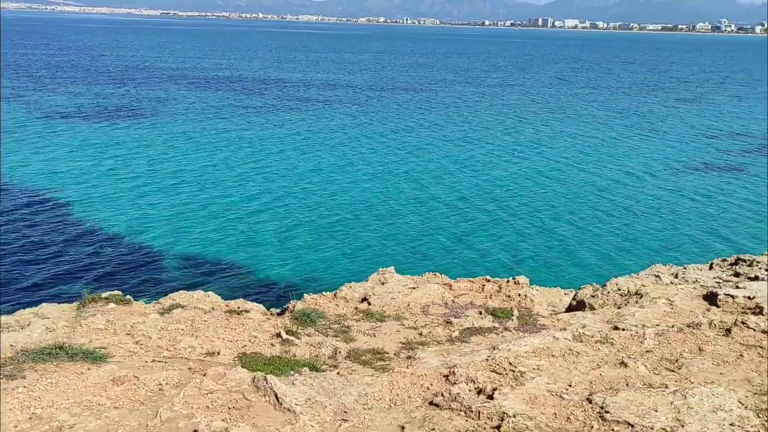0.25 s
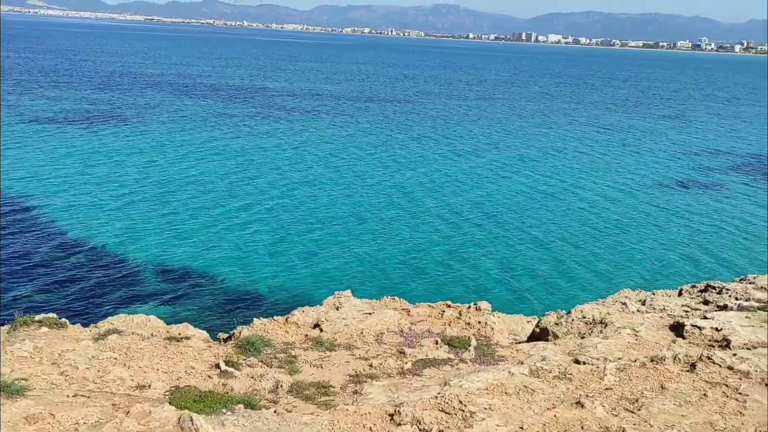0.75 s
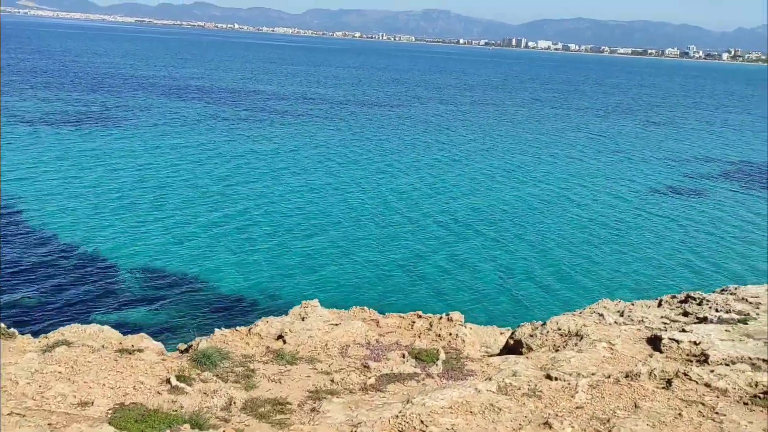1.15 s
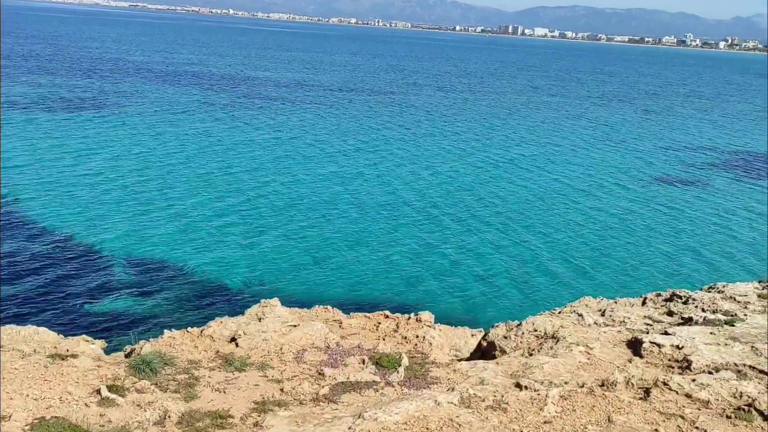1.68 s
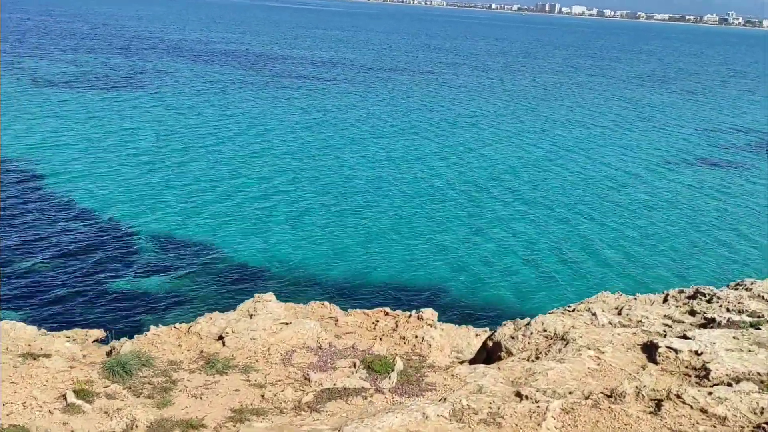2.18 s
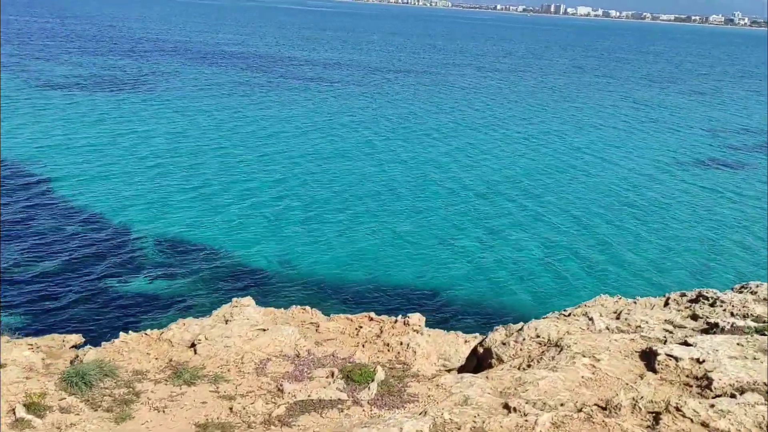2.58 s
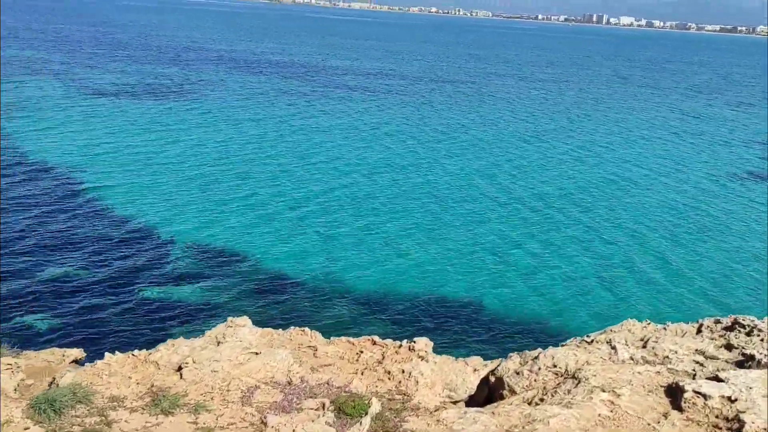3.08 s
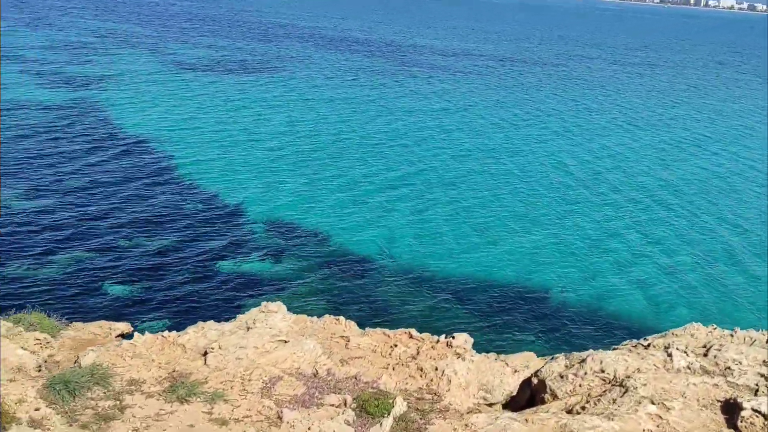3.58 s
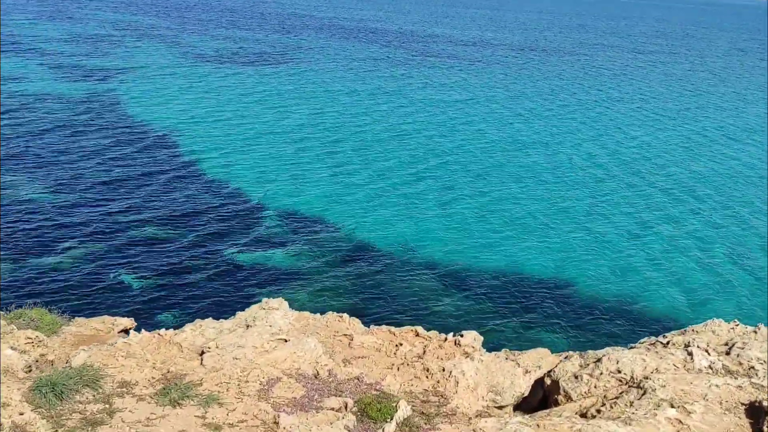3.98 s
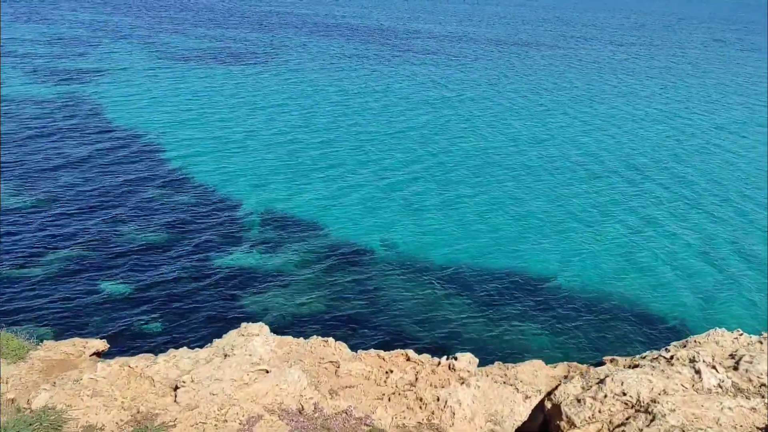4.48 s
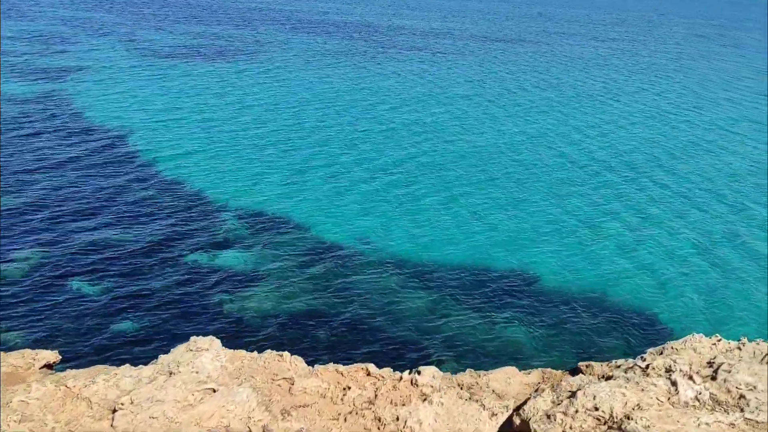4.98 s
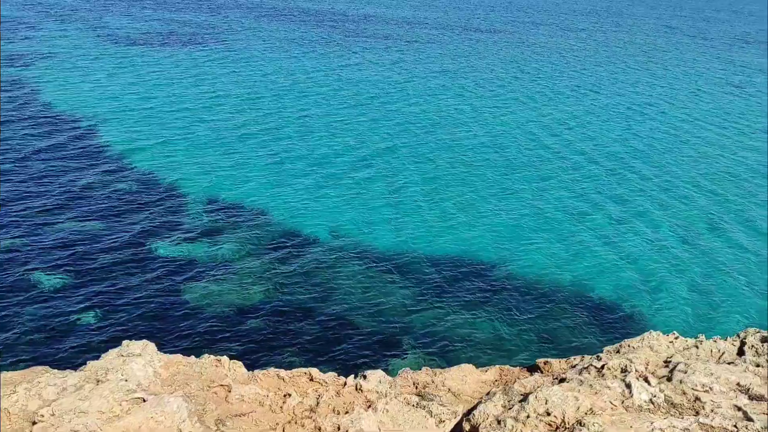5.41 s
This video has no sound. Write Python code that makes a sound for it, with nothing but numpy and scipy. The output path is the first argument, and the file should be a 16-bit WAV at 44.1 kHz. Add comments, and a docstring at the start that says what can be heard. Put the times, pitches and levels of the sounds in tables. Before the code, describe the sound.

Uneven footsteps on a rocky cliff, about two a second at most, each a cluster of sharp cracks and gritty crunching. The strongest come between one and two seconds; later ones are softer scuffs, with two tiny sole squeaks near the middle. Deep wind buffets the bare handheld microphone, shifting between sides, above very quiet distant sea wash and faint birds.

```python
"""Walker on a sea cliff

Dry, broken rock underfoot, taken on a hand-held phone with two microphone ports.
Close below, slips of stone ring and snap, grit grinds in grains and a sole squeaks by sticking and slipping.
Right on the ports, wind is separate shaped noise at each, with eddies as dull resonant thumps.
Far off, the sea is a hiss of shaped noise; a bird hoots three falling notes and a small one chirps, as gliding tones."""
import sys
import numpy as np
from scipy import signal
from scipy.fft import rfft, irfft
from scipy.io import wavfile
from scipy.ndimage import uniform_filter1d

SR = 44100
rng = np.random.default_rng(int(sys.argv[2]) if len(sys.argv) > 2 else 0)


def boost(x):
    """Linear amplitude factor 10**(x/20) for a level x in decibels (scalar or array-like)."""
    u = np.asarray(x, float) / 20
    return 10 ** u


def generate_wav(sig):
    """Save sig (samples, or channels by samples) to the path in sys.argv[1] as 16-bit PCM at SR."""
    pcm = np.round(np.clip(np.atleast_2d(sig).T, -1, 1) * 32767).astype(np.int16)
    wavfile.write(sys.argv[1], SR, pcm)


N = 249165
T = np.arange(N) / SR


def level(x, db):
    """Scale to an rms level."""
    return x * boost(db) / np.sqrt(np.mean(x ** 2))


def colour(x, table):
    """Filter by gains in dB, joined by straight lines over log frequency."""
    hz, db = np.transpose(table)
    f = np.maximum(np.arange(x.shape[-1] // 2 + 1) * SR / x.shape[-1], 1)
    gain = boost(np.interp(np.log(f), np.log(hz), db))
    return irfft(rfft(x) * gain, x.shape[-1])


def butter(x, order, hz, kind="low"):
    """Filter away what lies above (low) or below (high) a corner frequency."""
    return signal.sosfilt(signal.butter(order, hz, kind, fs=SR, output="sos"), x)


def walk(rate):
    """Random values, each held 1 / rate s, then slewed twice."""
    k = int(SR / rate)
    held = np.repeat(rng.standard_normal(N // k + 1), k)
    return 2.96 * uniform_filter1d(uniform_filter1d(held, k), k)[:N]


def add(out, s, x):
    """Mix x into out from time s."""
    i = int(s * SR)
    out[..., i:i + x.shape[-1]] += x[..., :N - i]


def ring(x, hz, width_hz):
    """One damped resonance; the wider it is, the sooner it dies."""
    r = np.exp(-np.pi * width_hz / SR)
    return signal.lfilter([1, 0, -1], [1, -2 * r * np.cos(2 * np.pi * hz / SR), r * r], x) * (1 - r * r) / 2


def sag(x, start, within_s):
    """Let the pitch begin `start` times higher and sink to its rest."""
    t = np.arange(len(x)) / SR
    return np.interp(t + (start - 1) * within_s * (1 - np.exp(-t / within_s)), t, x)


# steady wind on the ports, before flutter: (time [s], left level [dB], right level [dB])
GUSTS = [(0.0, -54.5, -44.5), (0.35, -60, -46.5), (0.713, -66.5, -58.5), (1.09, -57, -47),
         (1.41, -60.5, -52), (1.771, -67.5, -43), (2.12, -44, -63), (2.47, -50.5, -49), (2.829, -51.5, -53),
         (3.178, -47.5, -50), (3.525, -55, -59), (3.883, -57.5, -52), (4.24, -46.5, -43),
         (4.59, -50, -59.5), (4.94, -62.5, -48.5), (5.299, -53, -54.5), (5.65, -64.5, -47.5)]
# turbulence spectrum, falling steeply above the rumble: (frequency [Hz], gain [dB])
TURBULENCE = [(20, 5), (60, 3.5), (110, -3.5), (165, -1), (250, -14), (350, -24.5), (500, -37.5),
              (900, -62)]


def wind():
    """Unrelated turbulence at each port; three bands follow the gusts by their own share and flutter alone."""
    s, *port_db = np.transpose(GUSTS)
    gust = boost(np.array([np.interp(T, s, db) for db in port_db]))
    mean = np.sqrt(np.mean(gust ** 2))
    noise = level(colour(rng.standard_normal((2, N)), TURBULENCE), 3.96) * mean
    deep = butter(noise, 2, 80)
    edge = butter(noise, 2, 230, "high")
    middle = noise - deep - edge
    out = 0
    # the exponent says how closely each band follows a gust
    for band, follow in ((deep, 0.3), (middle, 1), (edge, 0.71)):
        flutter = boost(2.0 * np.array([walk(26), walk(26)]))
        out = out + band * (gust / mean) ** follow * flutter
    return out


# colour of the wash far below: (frequency [Hz], gain [dB])
WASH = [(200, -27.5), (400, -6), (800, -12), (1200, -18), (2600, -15.5), (4400, -12.5), (6300, -18),
        (10000, -17.5)]


def sea():
    """Distant wash, smooth and slowly swelling; the lows are partly shared by both ports."""
    shared = butter(rng.standard_normal(N), 1, 2000)
    swell = boost(0.8 * walk(3))
    wash = colour(0.43 * shared + rng.standard_normal((2, N)), WASH)
    return level(wash, -67.5) * swell


# eddies that thump the left port, then the right: (time of the peak [s], push level [dB], fade [s])
THUMPS = [
    [(0.673, -35.5, 0.004), (2.0, -25, 0.049), (2.225, -39, 0.038), (2.789, -33.5, 0.013),
     (3.122, -28, 0.013), (4.1, -36, 0.025), (4.192, -35.5, 0.0091), (4.375, -35, 0.055),
     (4.44, -27.5, 0.026)],
    [(0.02, -27, 0.0059), (0.16, -31, 0.022), (0.334, -33.5, 0.027), (0.446, -19, 0.01),
     (0.52, -30.5, 0.045), (0.562, -29.5, 0.016), (0.649, -39.5, 0.014), (1.072, -23, 0.02),
     (1.118, -26, 0.013), (2.285, -29, 0.015), (2.569, -34.5, 0.03), (2.619, -30, 0.012),
     (3.009, -28.5, 0.013), (4.001, -35, 0.014), (4.259, -31, 0.012), (4.45, -37.5, 0.079),
     (5.233, -34.5, 0.043), (5.587, -30, 0.02)],
]


def buffets():
    """A shed eddy slaps one port: a dull pressure wobble swells fast, sinks in pitch and fades."""
    out, t, rise_s = np.zeros((2, N)), np.arange(SR // 3) / SR, 0.011
    for port, rows in zip(out, THUMPS):
        for s, db, fade_s in rows:
            # weak pushes wobble near 123 Hz; beyond a soft knee at -25.5 dB the pitch climbs
            octaves = np.logaddexp(0, (db + 25.5) / 1.66) * 2.7 / 14
            hz = 123 * 2 ** octaves
            push = rng.standard_normal(len(t))
            wobble = ring(push, hz, 0.28 * hz) + ring(push, 0.44 * hz, 0.36 * hz)
            # the eddy keeps its strength from cycle to cycle
            wobble /= np.sqrt(uniform_filter1d(wobble ** 2, int(1.5 * SR / hz)))
            wobble = sag(wobble, 2.6, 0.011)
            swell = np.sin(np.pi / 2 * np.minimum(t / rise_s, 1)) ** 2
            swell = swell * np.exp(-np.maximum(t - rise_s, 0) / fade_s)
            dull = butter(swell * wobble, 3, 1.994 * hz)
            # its steep front leaks a brief brighter knock
            front = np.exp(-((t - 0.91 * rise_s) / 0.0027) ** 2)
            knock = 0.22 * (hz / 240) ** 3.1 * ring(push, 4.6 * hz, 4 * hz) * front
            add(port, s - rise_s, boost(db) * (dull + knock))
    return out


def sides(pan_db):
    """Left and right amplitudes whose powers add to one."""
    left = 1 / (1 + boost(-2 * np.asarray(pan_db)))
    return np.sqrt(np.array([left, 1 - left]))


# three hoots, then chirps:
# (start [s], length [s], start pitch [Hz], end pitch [Hz], level [dB], left minus right [dB])
BIRD_NOTES = [(.06, 0.3, 570, 480, -73.5, 15), (.78, 0.16, 561, 490, -75, 16),
              (1.3, 0.17, 530, 440, -68, 8), (0.317, 0.051, 3950, 3860, -58.5, 0),
              (3.278, 0.04, 4570, 4500, -63, 2), (4.502, 0.032, 4090, 3500, -71, -4),
              (4.558, 0.045, 3200, 2880, -73, -2), (5.362, 0.059, 3600, 3780, -69, -4),
              (5.388, 0.036, 5700, 5900, -71, -5), (5.407, 0.045, 4700, 5050, -66, -5)]


def birds():
    """Gliding, slightly wavering sine notes with soft ends."""
    out = np.zeros((2, N))
    for s, length_s, start_hz, end_hz, db, pan_db in BIRD_NOTES:
        glide = np.linspace(start_hz, end_hz, int(length_s * SR))
        hz = glide * (1 + 0.025 * walk(200)[:len(glide)])
        note = np.hanning(len(hz)) * np.sin(2 * np.pi * np.cumsum(hz) / SR)
        add(out, s, 2 * boost(db) * sides(pan_db)[:, None] * note)
    return out


def grains(per_s, spread_db, lag_s):
    """One-sample slips, long-tailed in size; each lies elsewhere, so has its own lag at the right port."""
    count = int(per_s * N / SR)
    at = rng.integers(0, N, count)
    size_db = spread_db * np.minimum(rng.exponential(size=count), 4.0)
    size = boost(size_db) * rng.standard_normal(count)
    lag = np.round(lag_s * SR * rng.standard_normal(count)).astype(int)
    late = np.clip(at + lag, 0, N - 1)
    return np.array([np.bincount(at, size, N), np.bincount(late, size, N)])


def pebbles():
    """Stones of every size knock apart from each other, each ringing a few cycles at its own pitch."""
    out = 0
    for hz in np.geomspace(400, 6000, num=9):
        knocks = grains(450, 3.6, 0.0002)
        stones = ring(ring(knocks, hz, 0.4 * hz), hz, 0.4 * hz)
        out = out + level(stones, 0) * np.sqrt(hz)
    return out


def pressure(t, length_s):
    """A press bites over the 41 ms before its time, then lets go ever faster: 25 dB down after one length."""
    bite = np.clip(1 + t / 0.041, 0, 1) ** 3
    return bite * boost(-25 * (np.maximum(t, 0) / length_s) ** 1.87)


# soles pressing and dragging on grit:
# (time [s], length [s], coarse grit level [dB], fine sand level [dB], pitch of the stones [Hz])
SOLE_PRESSES = [(0.084, 0.085, -77, -62, 1210), (0.346, 0.13, -55, -56.5, 1280),
                (0.476, 0.2, -64.5, -64.5, 1210), (0.568, 0.14, -62.5, -72, 1710),
                (1.128, 0.37, -57, -62.5, 1390), (1.226, 0.17, -56, -58, 1510),
                (1.669, 0.067, -57.5, -70, 1200), (1.778, 0.061, -53, -61, 1090),
                (1.866, 0.29, -68, -63, 1290), (2.275, 0.14, -61.5, -66, 970),
                (2.597, 0.13, -51.5, -56.5, 885), (2.657, 0.2, -63.5, -66, 1720),
                (2.764, 0.11, -61, -55, 1570), (2.87, 0.41, -82, -67, 1480),
                (3.016, 0.035, -68, -59.5, 1500), (3.22, 0.14, -59, -66.5, 1050),
                (3.331, 0.27, -62, -65.5, 1170), (3.564, 0.02, -55.5, -58.5, 2000),
                (3.816, 0.033, -63, -62, 1850), (4.035, 0.039, -57, -60, 1010),
                (4.085, 0.085, -50.5, -60, 950), (4.17, 0.14, -65, -70, 1020),
                (4.293, 0.1, -62.5, -71, 1200), (4.778, 0.29, -65.5, -63.5, 1000),
                (5.053, 0.023, -68, -52.5, 1800)]
# colour of the coarse grit: (frequency [Hz], gain [dB])
GRIT_COLOUR = [(300, 1), (600, -8), (1050, -9.5), (1700, -15.5), (2700, -9.5), (4500, -13.5), (7000, -19)]
# colour of the fine sand: (frequency [Hz], gain [dB])
SAND_COLOUR = [(1700, -5.5), (3800, 4), (7000, -0.5), (11000, -1)]


def grind():
    """Grit rolls and crushes while the sole presses: coarse grains knock and ring their stones, sand fizzes."""
    grit = level(colour(pebbles(), GRIT_COLOUR) * boost(1.35 * walk(140)), 0)
    sand = level(colour(grains(6500, 2.5, 0.00025), SAND_COLOUR) * boost(1.1 * walk(200)), 0)
    out = np.zeros((2, N))
    for s, length_s, grit_db, sand_db, hz in SOLE_PRESSES:
        span = slice(max(int((s - 0.06) * SR), 0), int((s + 4 * length_s) * SR))
        t, coarse = T[span] - s, grit[:, span]
        coarse = 0.58 * coarse + 0.73 * ring(coarse, hz, 0.42 * hz)
        out[:, span] += boost(grit_db) * coarse * pressure(t, length_s)
        # sand outlasts grit
        out[:, span] += boost(sand_db) * sand[:, span] * pressure(t, 1.6 * length_s)
    return out


# stones cracking under the sole: (time [s], ring peak level [dB], ring pitch [Hz], snap peak level [dB])
STONE_CRACKS = [(0.338, -37, 1290, -39), (0.359, -56, 1260, -40), (0.395, -40, 840, -64),
                (0.494, -78, 1076, -37), (0.511, -63, 1170, -35), (0.536, -51, 1300, -40),
                (1.1, -29.5, 1200, -27), (1.173, -35, 1430, -32), (1.24, -31, 1620, -34.5),
                (1.248, -41, 1310, -48), (1.277, -44, 1190, -48), (1.285, -59, 1250, -51),
                (1.742, -41.5, 2680, -57), (1.764, -46, 746, -58), (1.772, -42, 1220, -38),
                (1.848, -24, 1240, -36.5), (1.933, -48.5, 2890, -53), (2.275, -56.5, 970, -71),
                (2.336, -53, 950, -61), (2.585, -39, 800, -54), (2.595, -45, 1170, -48),
                (2.613, -37, 830, -37.5), (3.233, -46.5, 820, -46), (3.25, -50, 950, -53),
                (3.272, -43.5, 945, -65), (4.032, -41.5, 980, -44), (4.086, -42, 880, -57),
                (4.115, -52, 1480, -46), (4.297, -52, 1510, -47), (4.307, -53, 1090, -41.5),
                (4.758, -48.5, 2400, -59), (4.773, -50, 1050, -39), (4.82, -51.5, 1000, -54),
                (4.833, -52.5, 950, -62), (4.846, -56, 850, -64), (5.016, -71, 1500, -39),
                (5.053, -56, 2000, -44), (5.062, -55, 2600, -35), (5.124, -44, 1380, -34)]


def cracks():
    """A burst of slips rings the stone, sinking as the sole damps it; a bright snap rides on top."""
    out, t = np.zeros((2, N)), np.arange(SR // 12) / SR
    burst = np.minimum(t / 0.00078, 1) * (np.exp(-t / 0.0025) + 0.0092 * np.exp(-t / 0.0042))
    for s, ring_db, hz, snap_db in STONE_CRACKS:
        chance = rng.standard_normal((3, len(t)))
        slips = chance[0] * burst
        slips[int(0.0005 * SR)] += 4.5  # the first break is the hardest
        body = ring(slips, hz, 0.6 * hz) + 0.7 * ring(slips, 2.1 * hz, 1.2 * hz)
        body = butter(sag(body, 1.25, 0.0021), 2, 2.0 * hz)
        # each stone lies elsewhere, so its ring reaches the right port a little early or late
        lag = int(np.clip(3 * chance[0, -1], -5, 5))
        body = np.array([np.roll(body, 5), np.roll(body, 5 + lag)])
        # splinters fly from many spots, so each port hears its own, shorter snap
        snap = butter(chance[1:] * burst ** 2.6, 2, 3000, "high")
        add(out, s, boost(ring_db) * body / np.abs(body).max() + boost(snap_db) * snap / np.abs(snap).max())
    return out


# rubber skidding on rock: (time [s], length [s], level [dB], stone pitch [Hz], mean slip rate [1/s])
SKIDS = [(2.642, 0.06, -60.5, 1700, 280), (3.552, 0.035, -59.5, 1950, 200)]


def squeaks():
    """The sole sticks and slips in a quick, uneven run; each slip rings two narrow modes of the stone."""
    out = np.zeros((2, N))
    for s, length_s, db, hz, per_s in SKIDS:
        chance, slips = rng.standard_normal((40, 2)), np.zeros(SR // 5)
        at = np.cumsum(np.r_[0, (1 + 0.15 * chance[1:, 0]) / per_s])
        on = at < length_s
        arch = np.sin(np.pi * (0.29 + 0.76 * at[on] / length_s))
        slips[(at[on] * SR).astype(int)] = boost(1.9 * chance[on, 1]) * arch
        tone = ring(slips, hz, 0.1 * hz) + 0.4 * ring(slips, 1.57 * hz, 0.091 * hz)
        add(out, s, boost(db) * tone / np.sqrt(np.mean(tone[:int(length_s * SR)] ** 2)))
    return out


def rocks(x):
    """Nearby rock faces scatter the step; each port hears its own cluster of short echoes."""
    t = np.arange(SR // 15) / SR
    echo = rng.standard_normal((2, len(t))) * np.exp(-t / 0.0052) * (t > 0.0012) * boost(-28.0)
    echo[:, 0] = 1  # the direct sound
    return signal.fftconvolve(x, echo, axes=1)[:, :N]


def scene():
    """Steps close below, sea and birds afar, wind right on the ports."""
    steps = rocks(cracks() + grind() + squeaks())
    return steps + sea() + birds() + wind() + buffets()


def low_pass(x):
    """Removes everything above the highest recorded frequency."""
    return signal.sosfilt(signal.butter(12, 12750, fs=SR, output="sos"), x)


# microphone ports, left then right:
# (resonance [Hz], width [Hz], resonance gain [dB], treble gain from 5 kHz up, beside the resonance [dB])
MIC_PORTS = [(8970, 3300, -5.5, -16), (7300, 1050, 5.5, -9.5)]


def record(dry):
    """Each port adds its own treble resonance; a steep cut at 8690 Hz is mixed with a weaker uncut part."""
    ports = []
    for x, (hz, width_hz, db, treble_db) in zip(dry, MIC_PORTS):
        ports.append(colour(x, [(1500, 0), (5000, treble_db)]) + boost(db) * ring(x, hz, width_hz))
    wet = np.array(ports)
    mix = butter(wet, 8, 8690) + boost(-15) * wet
    return low_pass(mix)


dry = scene()
out = record(dry)
generate_wav(out)
```